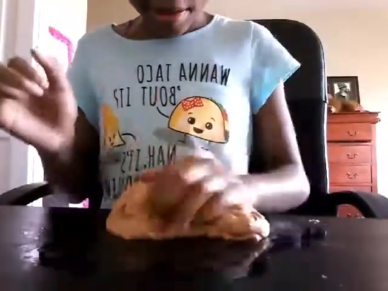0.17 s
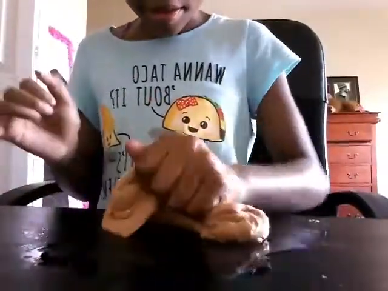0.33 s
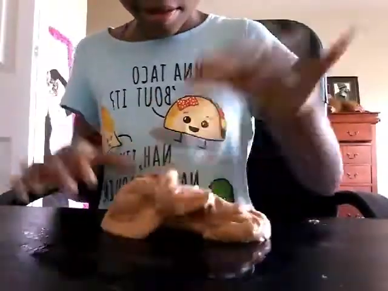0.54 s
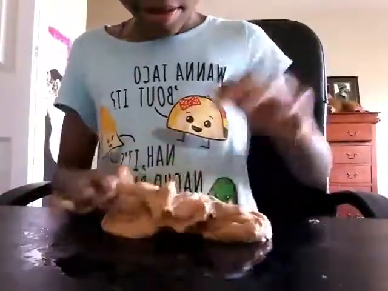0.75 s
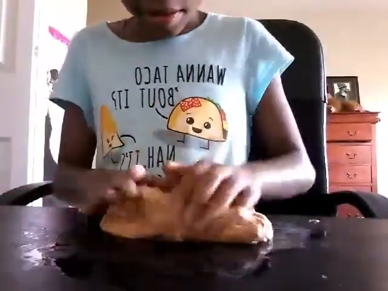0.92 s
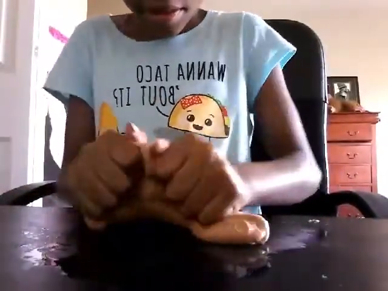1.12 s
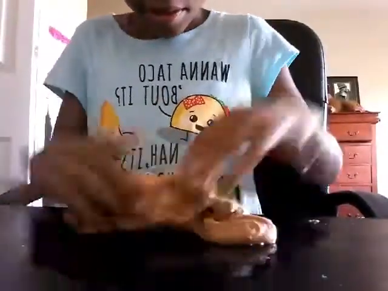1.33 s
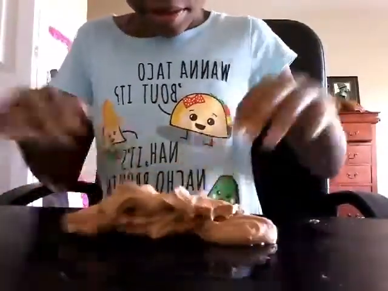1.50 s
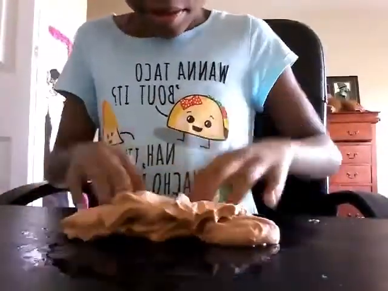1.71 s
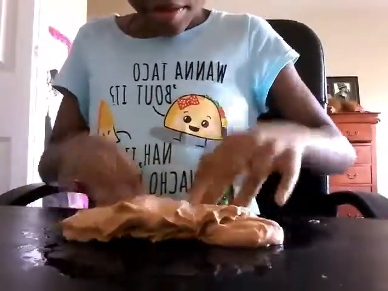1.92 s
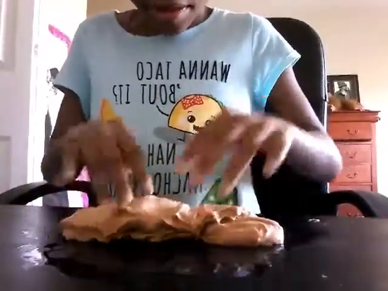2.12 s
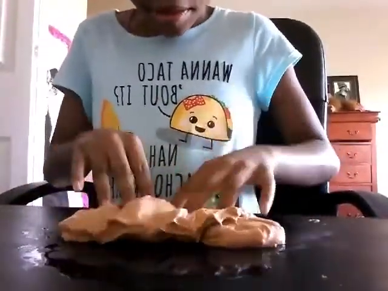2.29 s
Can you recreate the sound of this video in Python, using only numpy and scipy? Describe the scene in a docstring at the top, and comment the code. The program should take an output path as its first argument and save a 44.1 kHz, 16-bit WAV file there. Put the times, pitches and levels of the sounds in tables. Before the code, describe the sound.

Close up indoors, hands squeeze slime; bubbles snap loudly early on, a pause follows, more pops and wet slaps come, then low tabletop bumps and light crackles end it over faint hiss.

```python
"""Slime poked and kneaded on a wooden table in a small room, heard close up.
Air pockets burst as short pitched pops, damped sines with a noise snap, over a fine crackle of tiny ones.
Fingers thud through to the table top, which rings low in decaying modes; the wet lump slaps along.
Shaped noise gives the low rumble of arm movement through the table and a steady background hiss."""
import sys
import numpy as np
from scipy import signal
from scipy.fft import rfft, irfft, next_fast_len
from scipy.io import wavfile
from scipy.ndimage import map_coordinates

SR = 44100
rng = np.random.default_rng(int(sys.argv[2]) if len(sys.argv) > 2 else 0)


def field_ratio(decibels):
    """Amplitude ratio for a level in dB (20 dB per decade); scalars and array-likes work."""
    return 10 ** (np.asarray(decibels, dtype=float) / 20)


def waveform_to_disk(signal):
    """Save audio, clipped to [-1, 1], as 16-bit WAV at the path in sys.argv[1]."""
    frames = np.transpose(np.atleast_2d(signal))
    scaled = np.clip(frames, -1, 1) * 32767
    samples = np.round(scaled).astype(np.int16)
    wavfile.write(sys.argv[1], SR, samples)


N = 103635


def unit(x):
    """Scaled to rms 1."""
    return x / np.sqrt(np.mean(x ** 2) + 1e-20)


def along(points, hz):
    """(Hz, value) points interpolated on a log frequency axis."""
    f, v = np.transpose(points)
    return np.interp(np.log(hz + 1), np.log(f + 1), v)


def curve(rows):
    """A (s, value) table at every sample."""
    s, v = np.transpose(rows)
    return np.interp(np.arange(N) / SR, s, v)


def filtered(x, response):
    """x times a complex response of frequency."""
    size = next_fast_len(N + SR // 2)
    hz = np.fft.rfftfreq(size, 1 / SR)
    return irfft(rfft(x, size) * response(hz), size)[..., :N]


def coloured(spectrum):
    """Noise of rms 1 with the given (Hz, dB) spectrum."""
    return unit(filtered(rng.standard_normal(N), lambda hz: field_ratio(along(spectrum, hz))))


def wobble(knots_per_s):
    """A smooth random curve through random knots."""
    return map_coordinates(rng.standard_normal(400), [np.arange(N) * knots_per_s / SR])


def placed(s, rows):
    """Sum of the rows, each starting at its time."""
    at = np.round(np.asarray(s) * SR).astype(int)[:, None] + np.arange(rows.shape[1])
    return np.bincount(at.ravel(), rows.ravel(), N + SR)[:N]


def bubbles(hz, cycles, count):
    """Damped sines with a soft start and rising pitch, one row each; cycles to lose 30 dB, at least 1."""
    phase_rise, attack_share = 0.031, 0.089  # both per 30 dB life
    turns = np.arange(count) / SR * np.asarray(hz)[:, None]
    life = turns / np.maximum(cycles, 1)
    ring = np.sin(2 * np.pi * turns * (1 + phase_rise * life)) * field_ratio(-30 * life)
    return ring * (1 - np.exp(-(life / attack_share) ** 2))


def pops():
    """Bursting pockets ring briefly under a sharp noise snap; returned bare, and with near reflections."""
    # Each row: start in seconds, level in dB, pitch in Hz, cycles to lose 30 dB, snap over the ring in dB.
    bursts = [(0.025, -22.5, 3160, 2.5, -23), (0.0464, -30.5, 3010.0, 4, -36), (0.0556, -31, 4370, 5, -33),
              (0.2344, -10, 950, 0.5, -17), (0.2478, -23, 1110, 11, -24), (0.2525, -38, 2290, 24, -30),
              (0.2529, -18, 1164, 11.5, -18), (0.286, -33, 5600, 12, -8), (0.3199, -20, 1590.0, 1, -19),
              (0.3314, -3, 9330, 5.5, -10), (0.3346, 2.5, 5250, 4.5, -24.5), (0.3438, 4.5, 5170, 5.5, -25),
              (0.3597, -15, 1500, -0.5, -21), (0.37, -25, 1150, 2.5, -26), (0.3842, -25.5, 1420, 14.5, -42),
              (0.3868, -24, 1820, 8, -46), (0.3891, -17, 990, 3, -35), (0.4158, -29, 1990, 3, -30),
              (0.4736, -18.5, 2750, 2.5, -5), (0.479, -17.5, 2800, 4, -8), (0.4788, -17, 794, 2.5, -30),
              (0.4925, -15, 2060, 1, -21), (0.546, -35, 2840.0, 3.5, 4), (0.5475, -28.5, 1350, 5.5, -23),
              (1.045, -24.5, 4200, 2.5, -13), (1.0528, -17, 892, 1.5, -24), (1.069, -23, 880, 5, -17),
              (1.071, -30.5, 4200, 15, -16), (1.1083, -33.5, 3900, 14, -12), (1.131, -33, 9000.0, 6, -5.5),
              (1.139, -17, 2520, 3.5, -13.5), (1.139, -13, 10640, 8, -22.5), (1.159, -24, 4240, 5.5, -8),
              (1.1754, 1.5, 2800, 1.9, -13.5), (1.1824, -18, 1290.0, 2.5, -6.5), (1.187, -12, 2980, 3, -22),
              (1.2072, -24, 2680, 1, -21), (1.228, -9.5, 4150, 5, -7.5), (1.233, -10.5, 4120, 2.5, -13),
              (1.3065, -33, 3400, 14, -21), (1.3055, -35, 913, 8, -18), (1.319, -29, 2600, 7, -24.5),
              (1.3225, -25, 1475, 9, -4.5), (1.3209, -26, 5270, 12, -17.5), (1.3401, -25, 966, 7.5, -8),
              (1.3417, -26, 3900, 12, -15), (1.348, -26, 1350, 1, -10.5), (1.357, -28.5, 3820, 5.5, -11.5),
              (1.3972, -27, 4300, 5.5, -13), (1.4071, -30.5, 4200, 10, -8), (1.4255, -30, 835, 3.5, -12.5),
              (1.841, -42, 1396, 0.5, -23), (1.9557, -37.5, 2615, 5.5, -16), (1.986, -30.5, 4300, 12, 0),
              (1.998, -41.5, 4380, -9, 4.5), (2.0169, -32, 3780, 6, -5), (2.0277, -26.5, 3280, 2, -8.5),
              (2.0486, -17, 1120, 1.5, -21.5), (2.051, -29.5, 3900, 3, -16.5)]
    snap_t60_s, snap_dull_hz = 0.007, 6200
    scatter_db, scatter_t60_s, scatter_gap_s = -21.5, 0.012, 0.0006
    s, db, hz, cycles, snap_db = np.transpose(bursts)
    t = np.arange(600) / SR
    draws = rng.standard_normal((len(s), 2, len(t)))

    pole = np.exp(-2 * np.pi * snap_dull_hz / SR)
    dull_noise = unit(signal.lfilter([1], [1, -2 * pole, pole ** 2], draws[:, 0]))
    snap = dull_noise * field_ratio(-60 * t / snap_t60_s)
    bare = bubbles(hz, cycles[:, None], count=600) + field_ratio(snap_db)[:, None] * snap

    # direct sound plus scatter off table, lump and hands, new for each pop
    scatter = (t > scatter_gap_s) * field_ratio(scatter_db - 60 * t / scatter_t60_s) * draws[:, 1]
    near = signal.fftconvolve(bare, (t == 0) + scatter, axes=1)
    level = field_ratio(db)[:, None]
    return placed(s, level * bare), placed(s, level * near)


def crackle():
    """Countless tiny pockets burst in short clumps, louder as the slime is worked harder."""
    # Each row: time in seconds, crackle level in dB.
    kneading = [(0, -64.5), (.04, -57.5), (.1, -69), (.23, -70), (.25, -54), (.31, -52), (.37, -49),
                (.45, -60), (.5, -46), (.58, -63), (.7, -77), (1.04, -62.5), (1.06, -44.5), (1.16, -52),
                (1.29, -57.5), (1.31, -44), (1.35, -44), (1.44, -56.5), (1.46, -67.5), (1.7, -73.5),
                (1.82, -64.5), (1.97, -79), (2.05, -55.5), (2.13, -63.5), (2.35, -66.5)]
    per_s, centre_hz, log_spread, cycles = 4000, 2800, 0.55, 3.7
    size_db, clump_db, clump_knots_per_s = 3.5, 2.5, 56
    n = int(per_s * N / SR)
    hz = np.clip(centre_hz * np.exp(log_spread * rng.standard_normal(n)), 500, 15000)
    size = field_ratio(size_db * np.minimum(rng.exponential(size=n), 4)) * rng.choice([-1, 1], n)
    grains = placed(rng.uniform(0, N / SR, n), size[:, None] * bubbles(hz, cycles, count=400))
    clumped = field_ratio(clump_db * wobble(clump_knots_per_s)) * grains
    return field_ratio(curve(kneading)) * unit(clumped)


def thuds():
    """A soft push rings the modes of the table, each landing weighing them anew; the wet lump slaps along."""
    # Each row: start in seconds, force in dB, contact dulls above in Hz, wet slap over the force in dB.
    landings = [(.027, -27.5, 300, 0.5), (.05, -23.5, 195, -11), (0.235, -12, 650, 9.5),
                (.243, -16, 180, -21), (0.249, -27, 600, 14), (0.3277, -16, 494, 0.5),
                (0.334, -20, 251.3, 10), (.479, -43.5, 900, 23), (.522, -25, 114.2, -15),
                (0.7493, -29.5, 386, -6.5), (1.0528, -19.5, 401, 8), (1.068, -43.5, 494, 31),
                (1.079, -22, 380, 3.5), (1.175, -38, 698, 20), (1.841, -34, 412, -4.5),
                (1.988, -11.5, 300, -14.5), (2.018, -15.5, 322, -2), (2.028, -19, 300, -7.5),
                (2.0485, -22, 382, 4.5), (2.094, -28, 354, -8)]
    # Modes of the table top. Each row: frequency in Hz, level in dB, t60 in seconds.
    table_modes = [(60.9, -12.5, 0.24), (94.7, -0.5, 0.091), (128.7, -4, 0.081), (203.7, -5.5, 0.12),
                   (245.8, -1.5, 0.061), (300, -2, 0.097), (378.6, -12.5, 0.14), (468, -8.5, 0.062),
                   (590, -3, 0.045), (839, -5, 0.053), (1038, -5.5, 0.072)]
    attack_cycles, spot_db = 0.85, 3.5  # mode build-up; scatter between landing spots
    slap_hz, slap_width_hz, slap_t60_s = 850, 830, 0.034
    t = np.arange(SR // 3) / SR
    hz, db, t60_s = np.transpose(table_modes)[:, :, None]
    s, force_db, dull_hz, slap_db = np.transpose(landings)[:, :, None]

    build_up = 1 - np.exp(-t * hz / attack_cycles)
    modes = field_ratio(db - 60 * t / t60_s) * build_up * np.sin(2 * np.pi * hz * t)
    spot_force = field_ratio(force_db + spot_db * rng.standard_normal((len(s), len(hz))))
    weights = spot_force / (1 + (hz.T / dull_hz) ** 2)
    ringing = placed(s[:, 0], weights @ modes)

    noise = rng.standard_normal((len(s), len(t)))
    slaps = placed(s[:, 0], field_ratio(force_db + slap_db - 60 * t / slap_t60_s) * noise)

    def band(f):
        """Resonant band-pass of the wet lump."""
        return 1j * f * slap_width_hz / (slap_hz ** 2 - f * f + 1j * f * slap_width_hz)

    return -ringing + filtered(filtered(slaps, band), band)


def room(x, steady, count=6):
    """Noise tails, their decay set by frequency, take turns every 200 samples so echoes do not repeat."""
    # Decay. Each row: frequency in Hz, t60 in seconds.
    decay = [(150, 0.31), (800, 0.34), (2500, 0.14), (6000, 0.28), (14000, 0.41)]
    # Tail colour. Each row: frequency in Hz, relative level in dB.
    tint = [(100, 2), (1000, -1), (4000, -4), (9000, -11), (16000, -5)]
    gap_s = 0.004
    hz, t, z = signal.stft(rng.standard_normal((count, SR // 2)), SR, nperseg=256)
    tail_db = along(tint, hz)[:, None] - 60 * t / along(decay, hz)[:, None]
    tails = signal.istft(z * field_ratio(tail_db), SR, nperseg=256)[1]
    tails = tails / np.linalg.norm(tails[0])
    turns = x * (np.arange(N) // 200 % count == np.arange(count)[:, None])
    sent = turns + np.eye(count)[:, :1] * steady  # steady keeps to the first tail
    wet = signal.fftconvolve(sent, tails, axes=1).sum(axis=0)
    return np.pad(wet, (round(gap_s * SR), 0))[:N]


def rumble():
    """Low noise of arm and hand movement through the table."""
    # Each row: time in seconds, level in dB.
    movement = [(0.0, -38.5), (0.12, -53), (0.44, -51), (0.6, -63), (0.81, -63.5), (0.99, -43.5),
                (1.11, -64), (1.24, -51.5), (1.36, -43.5), (1.5, -51.5), (1.65, -56), (1.9, -58.5),
                (2.02, -56), (2.15, -42.5), (2.2, -45.5), (2.35, -50.5)]
    # Each row: frequency in Hz, relative density in dB per Hz.
    spectrum = [(15, -35), (25, -40), (65, -6.5), (145, -27), (172, -21.5), (195, -25.5), (452, -44),
                (500, -43), (700, -79)]
    return field_ratio(curve(movement)) * coloured(spectrum)


def hiss():
    """Steady background hiss, shaped noise that ends steeply at 15.8 kHz."""
    # Each row: frequency in Hz, relative density in dB per Hz.
    spectrum = [(88, -54.5), (150, 2), (846, -6), (1180, -10.5), (1360, -18), (1970, -15.5), (3160, -17),
                (12500, -17.5), (15750, -12.5), (15900, -52.5)]
    level_db = -64
    return field_ratio(level_db) * coloured(spectrum)


def scene():
    """Slime and table in the room, over rumble and hiss."""
    room_db = -12.5
    thud_room_db = -4.5  # the table is heard more through its top than through the air
    (bare, near), fine, table = pops(), crackle(), thuds()
    wet = room(bare, fine + field_ratio(thud_room_db) * table)
    return (near + fine + table + field_ratio(room_db) * wet + rumble() + hiss())[None]


def top_cut(x):
    """Nothing passes above the cut-off."""
    return signal.sosfilt(signal.butter(12, 16630, fs=SR, output="sos"), x)


def record(dry):
    """The small microphone loses the deepest bass steeply and softens the top."""
    low_hz, top_hz = 58, 13770

    def microphone(hz):
        """Two second-order high-passes and two one-pole low-passes."""
        high_pass = (-hz * hz / (low_hz ** 2 - hz * hz + 1.2j * hz * low_hz)) ** 2
        return high_pass / (1 + 1j * hz / top_hz) ** 2

    return top_cut(filtered(dry, microphone))


dry = scene()
out = record(dry)
waveform_to_disk(out)
```